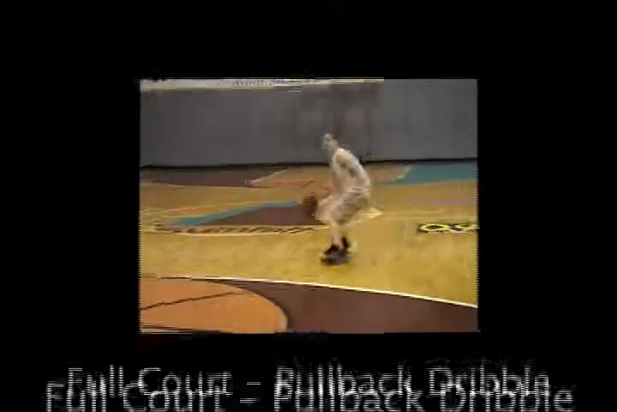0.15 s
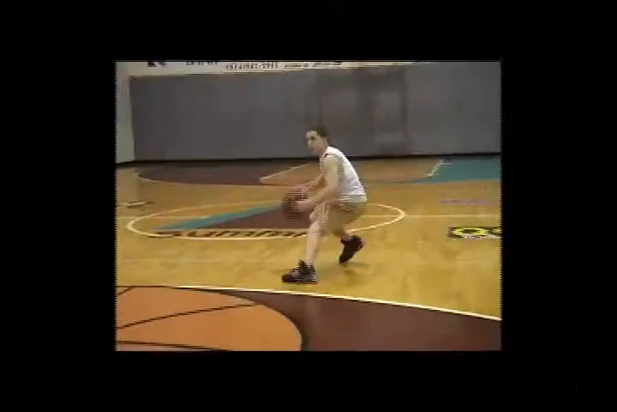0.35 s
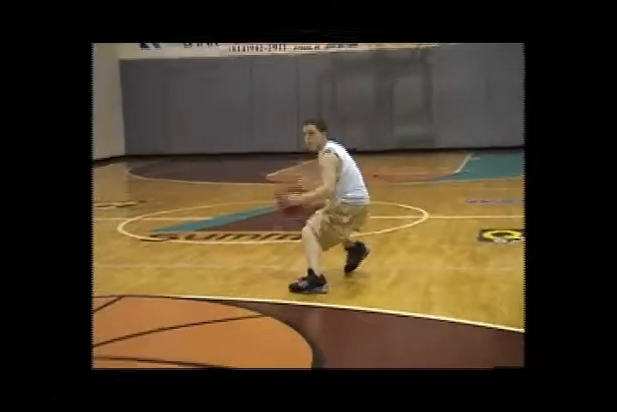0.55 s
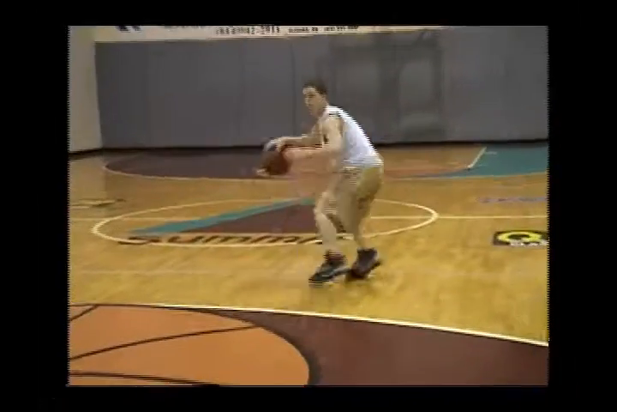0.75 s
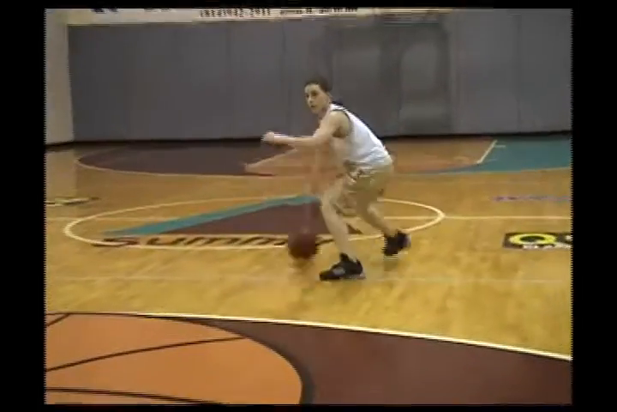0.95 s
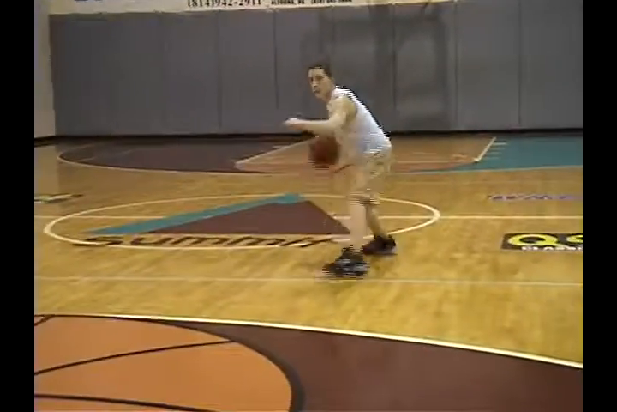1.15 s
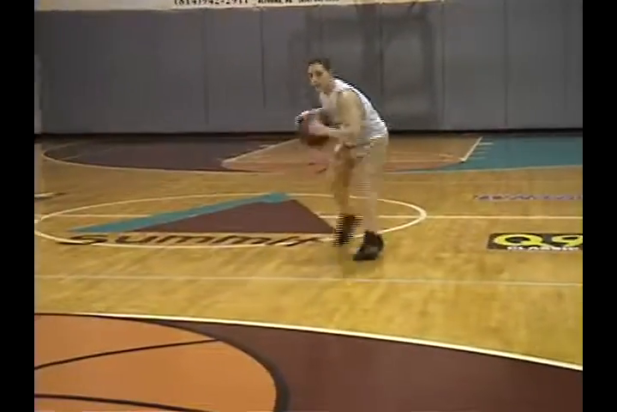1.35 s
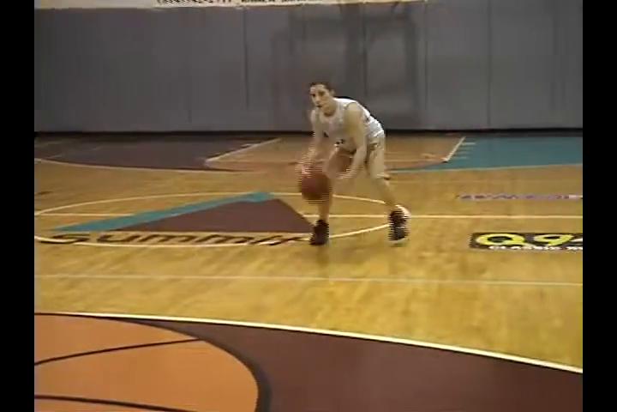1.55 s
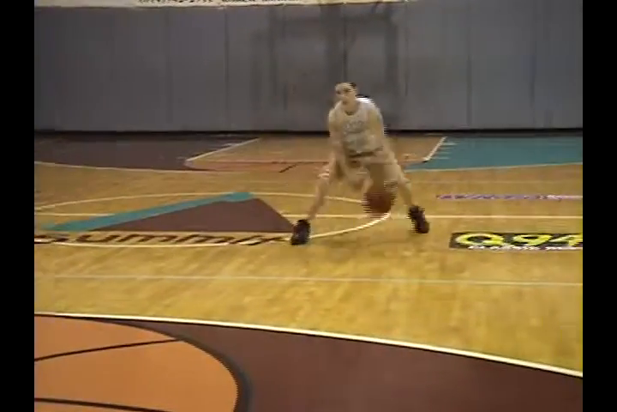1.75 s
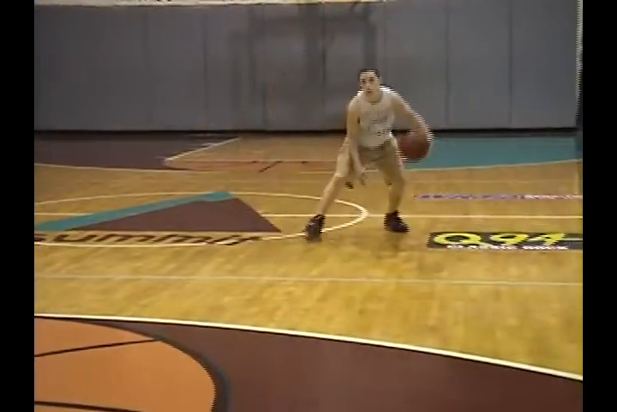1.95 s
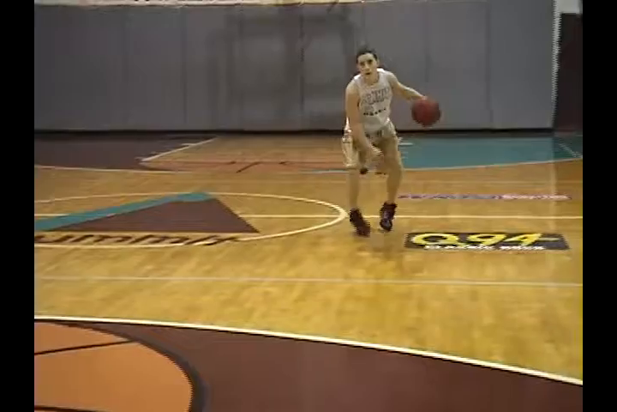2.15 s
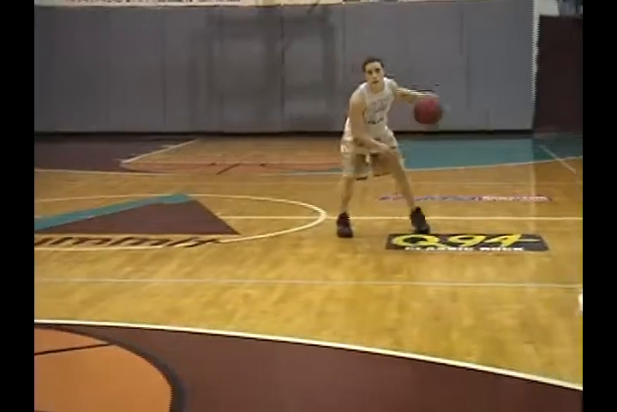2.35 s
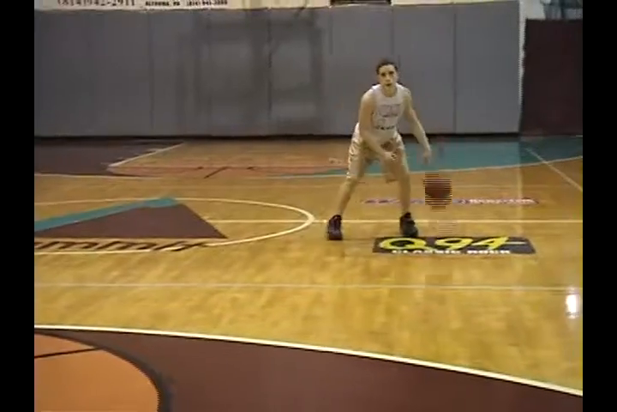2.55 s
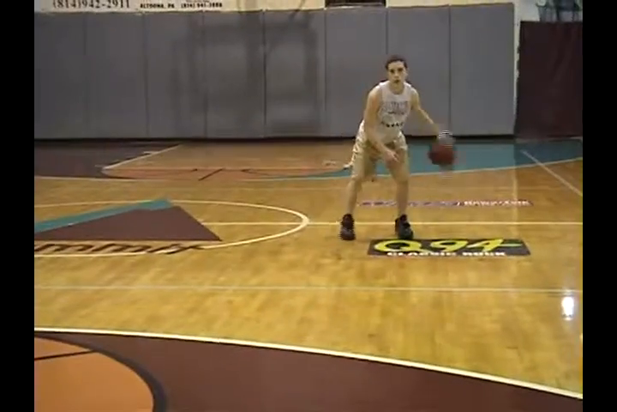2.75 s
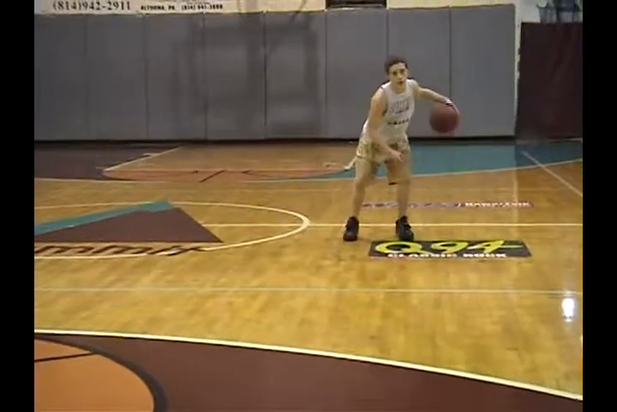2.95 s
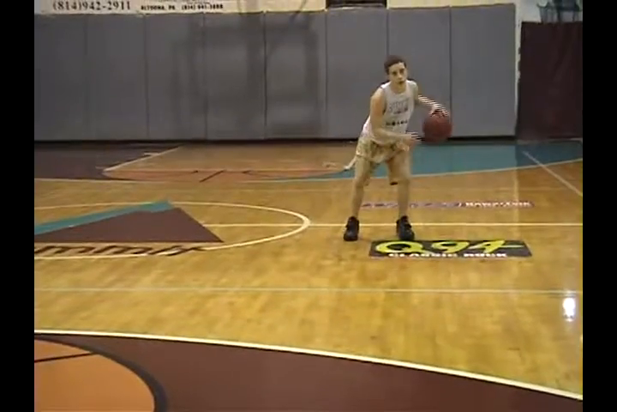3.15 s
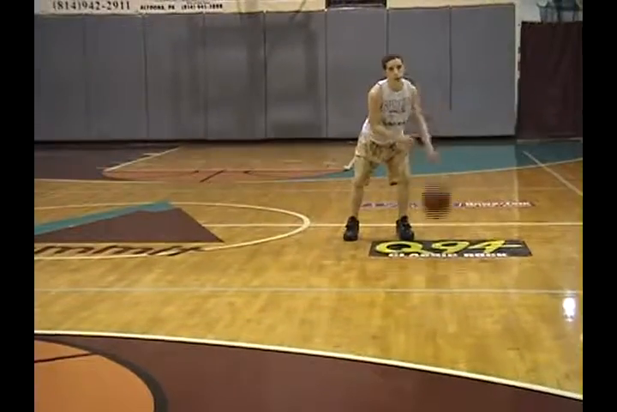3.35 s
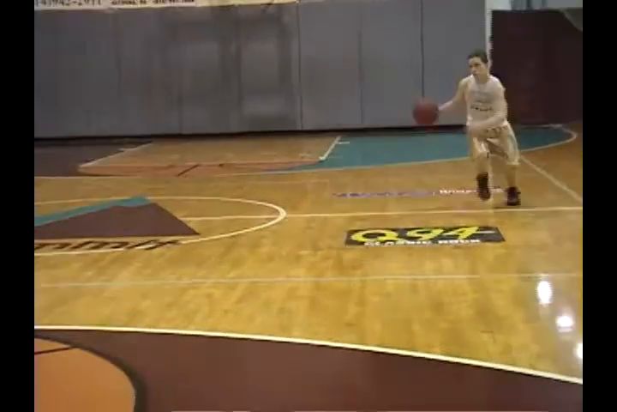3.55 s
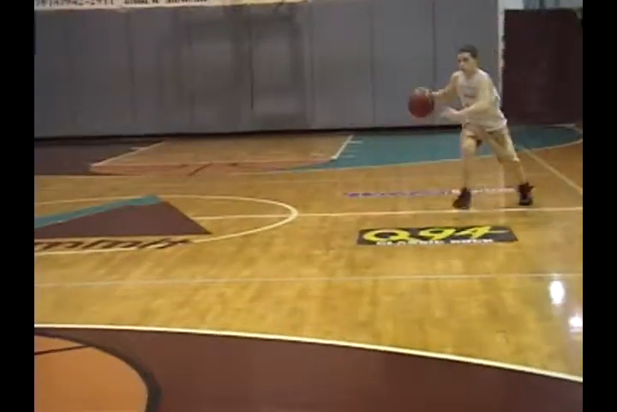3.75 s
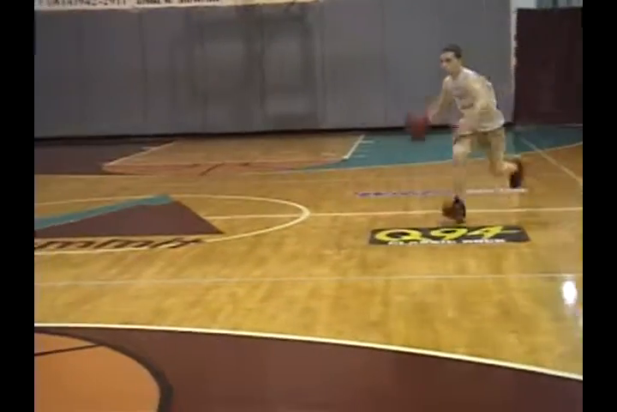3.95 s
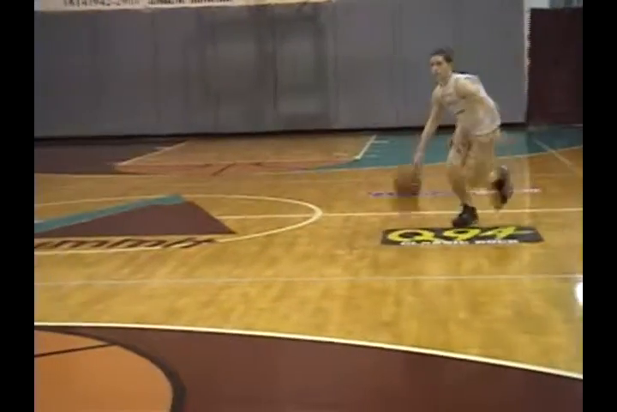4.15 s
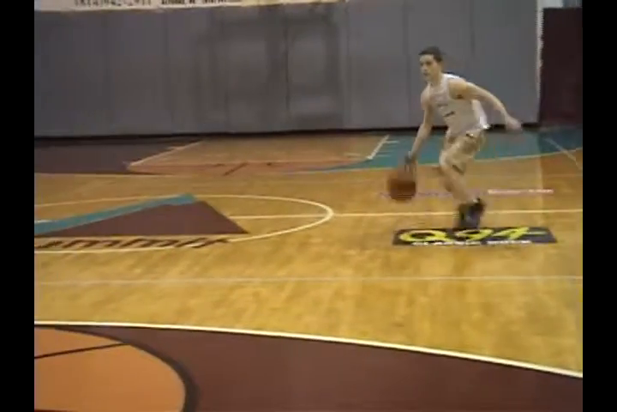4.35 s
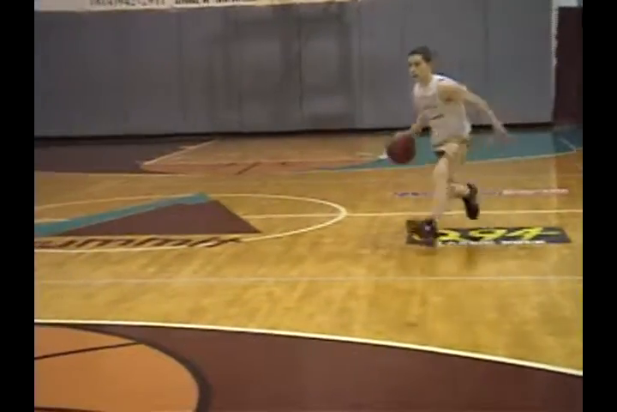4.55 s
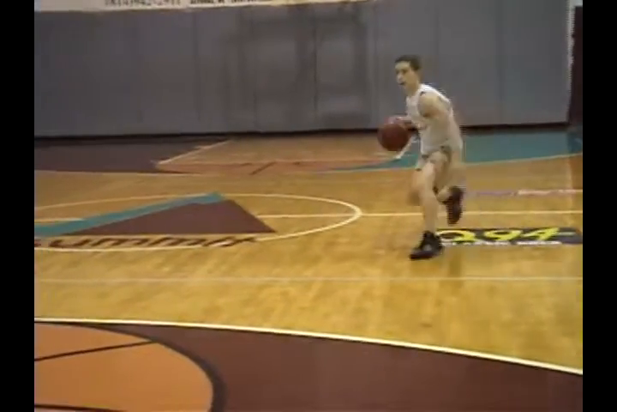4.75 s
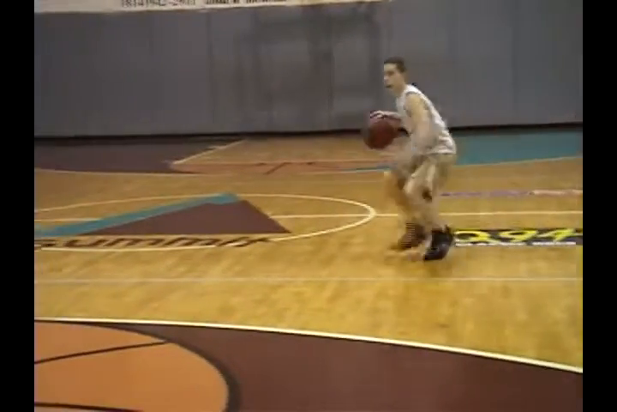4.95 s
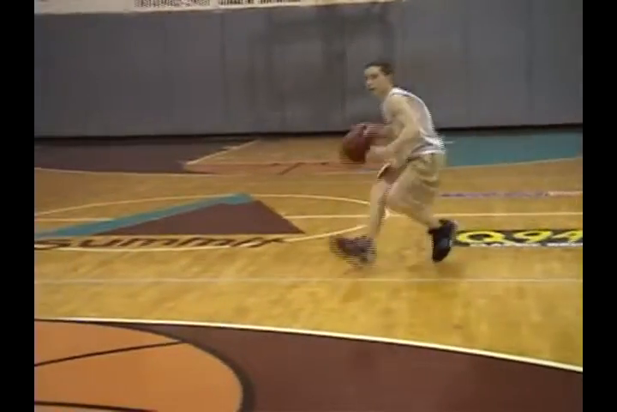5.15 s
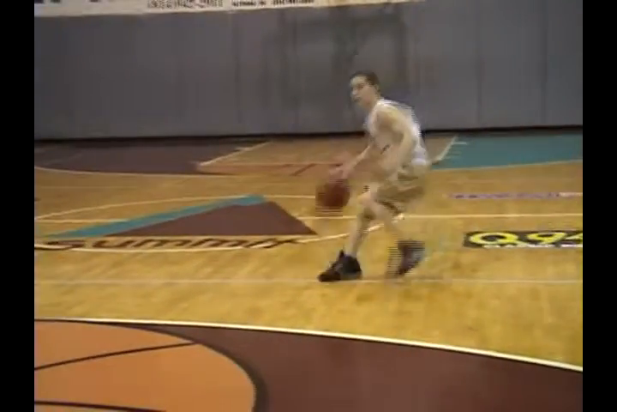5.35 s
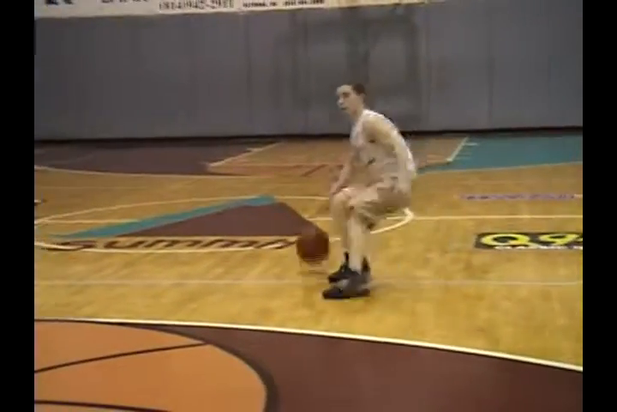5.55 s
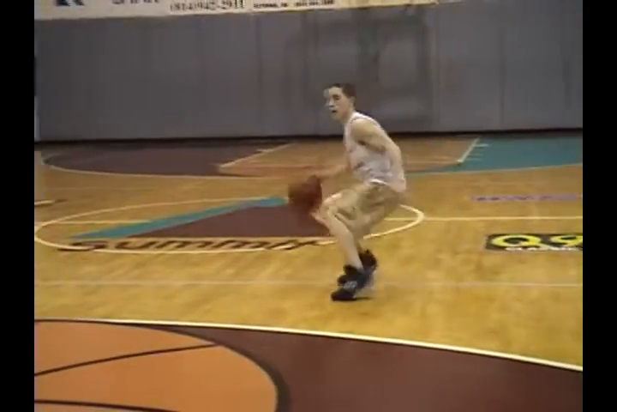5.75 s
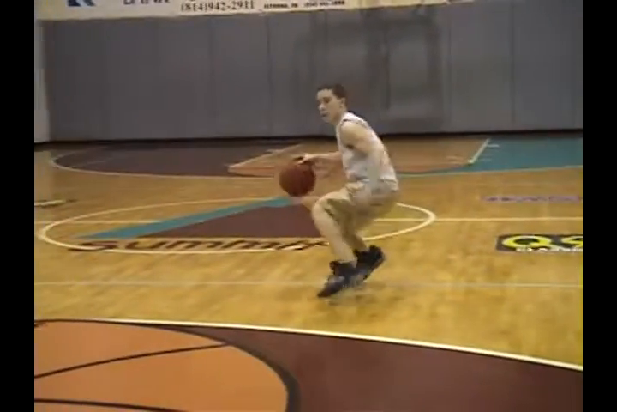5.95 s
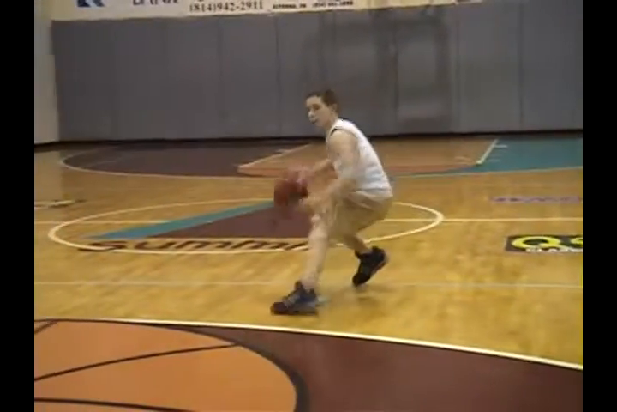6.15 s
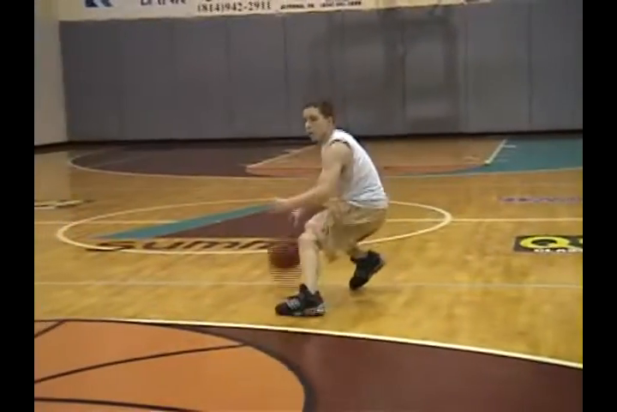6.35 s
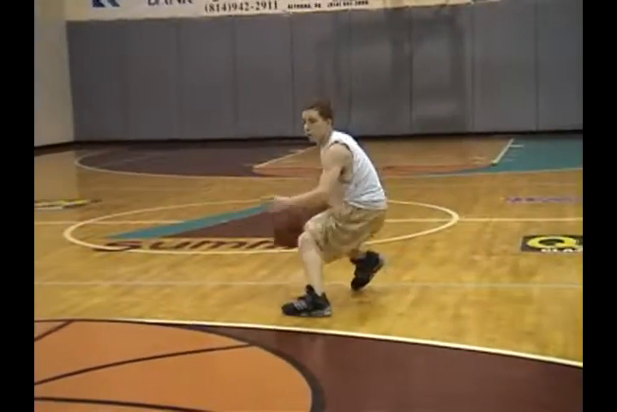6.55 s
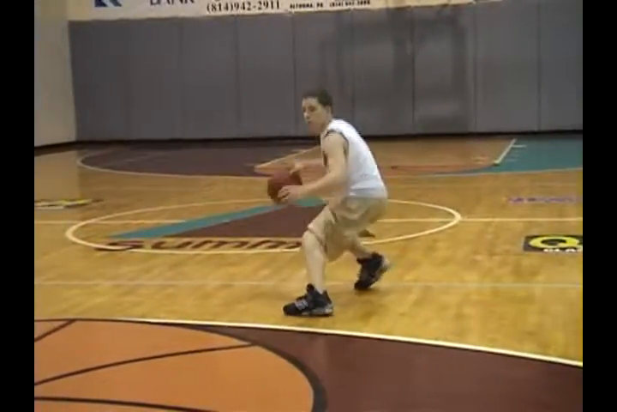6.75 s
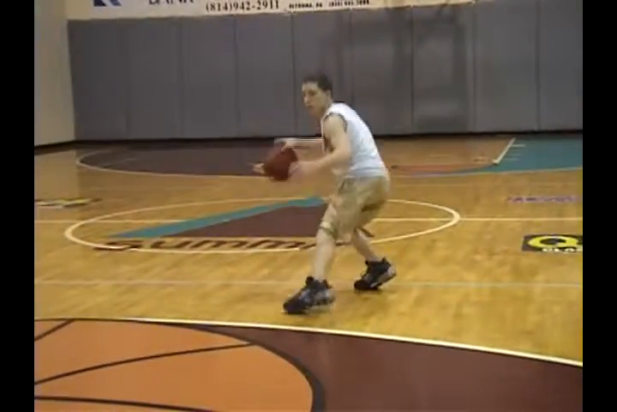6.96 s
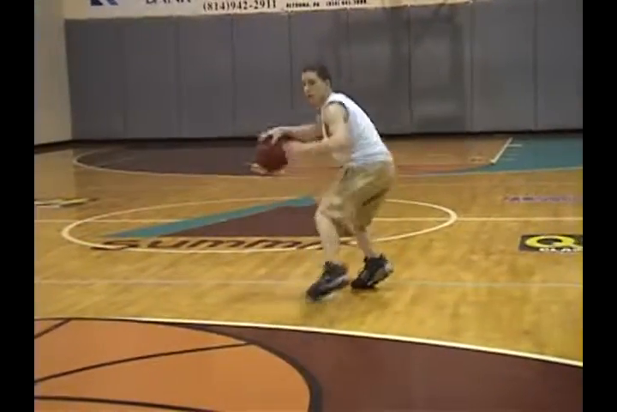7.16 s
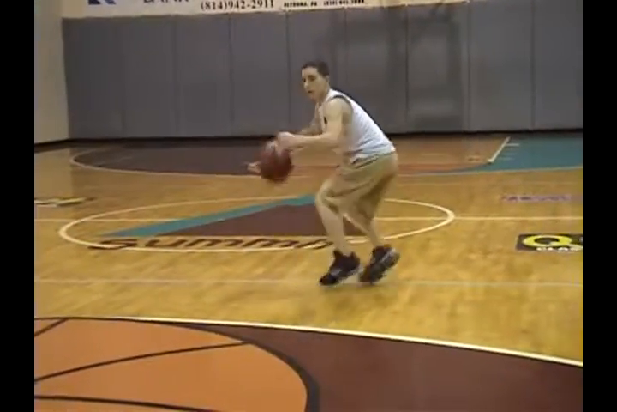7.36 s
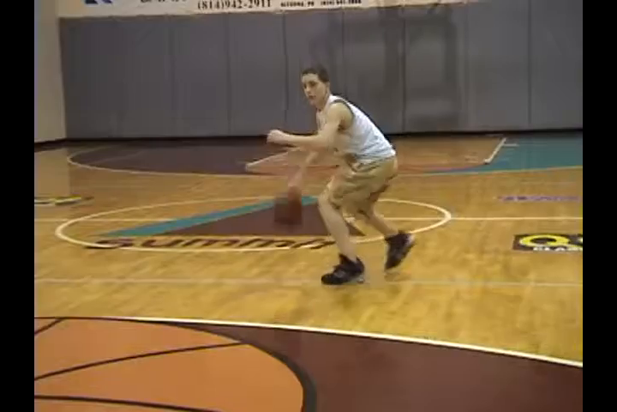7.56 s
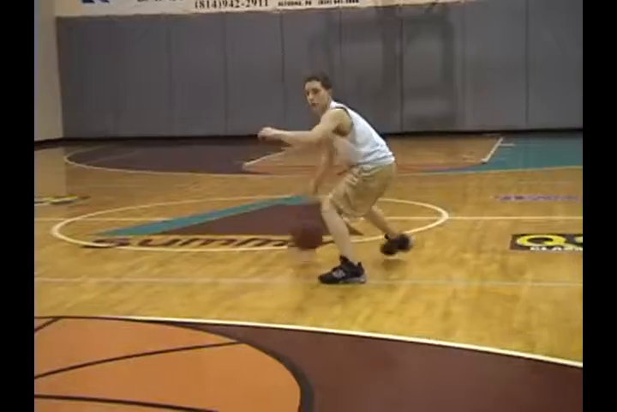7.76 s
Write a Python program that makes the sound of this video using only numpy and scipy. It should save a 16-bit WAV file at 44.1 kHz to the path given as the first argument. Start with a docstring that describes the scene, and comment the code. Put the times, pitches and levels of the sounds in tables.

```python
"""Basketball in a large gym

Close to the microphone a ball cracks on the sprung wooden floor, its skin and air ringing over the
thump of the boards. Shoes stamp and squeak; ventilation hums behind. Each blow returns from a near
surface, the wall and the far end, then rings on in the hall. At 3.6 s the sound jumps back to the
opening moves, now in slow motion: slower, deeper and quieter."""
import sys
import numpy as np
from scipy import signal
from scipy.fft import rfft, irfft, next_fast_len
from scipy.io import wavfile
from scipy.ndimage import uniform_filter1d, map_coordinates

SR = 44100
rng = np.random.default_rng(int(sys.argv[2]) if len(sys.argv) > 2 else 0)


def store_pcm(level_fs):
    """Save levels as 16-bit WAV."""
    pcm = np.round(np.clip(level_fs, -1, 1) * 32767).astype(np.int16)
    wavfile.write(sys.argv[1], SR, np.atleast_2d(pcm).T)


N = 344862

# Times and pitches are at normal speed. Blows before 0 s are struck before the listening starts.
LEAD_S = 1   # the court is already sounding this long before 0 s
COURT, BLOW, TAIL = int(4.7 * SR), int(.3 * SR), int(2.4 * SR)   # lengths in samples
NEAR_ECHO_S, FAR_ECHO_S = .0114, .077
SHOE_DETOUR_M = .55   # a shoe's wall echo travels this much further than the ball's

# Modes of the sprung floor: (multiple of the board pitch, level [dB], t60 [s])
BOARDS = [(.55, -18, 0.42), (.87, -15, 0.11), (1.05, 0.5, 0.045), (1.5, -9.5, 0.07), (1.95, -13.5, 0.046)]


def from_db(db):
    """Decibels to gain."""
    return 10 ** (np.asarray(db) / 20)


def add(track, s, sound):
    """Mix a sound into a track at time s."""
    start = max(round(s * SR), 0)
    part = sound[:len(track) - start]
    track[start:start + len(part)] += part


def low_pass(x, hz, order=2):
    """Causal treble cut."""
    return signal.sosfilt(signal.butter(order, min(hz, .45 * SR), fs=SR, output="sos"), x + 1e-18)


def noise(gain_at, size):
    """Noise of rms 1 whose spectrum follows a function of frequency."""
    hz = np.arange(1, size // 2 + 2) * SR / size
    x = irfft(rfft(rng.standard_normal(size)) * gain_at(hz), size)
    return x / x.std()


def dying(t, t60):
    """Exponential decay, 60 dB down at t60."""
    return np.exp(-np.log(1000) * t / t60)


def smoothed_spectrum(sound, size):
    """Magnitude spectrum averaged over about half an octave."""
    power = abs(rfft(sound, size)) ** 2
    bins = np.arange(len(power)) + 1
    log_grid = np.geomspace(1, len(power), 4000)
    averaged = uniform_filter1d(np.interp(log_grid, bins, power), size=125)
    return np.sqrt(np.interp(bins, log_grid, abs(averaged)))


def steady_background():
    """Steady background: a rush of air and a wavering motor hum, with a few thin, steady high tones above them."""
    # Spectrum of the moving air: (frequency [Hz], relative density [dB])
    air = [(15, -48.5), (25, -14.5), (48, 0), (81, -0.5), (109, -5), (186, 1.5), (309, -4.5), (354, -4),
           (415, -6), (501, -4), (833, -12.5), (4150, -31.5), (10000, -43.5), (15000, -52)]
    # Narrow noise bands of the motor hum: (centre [Hz], level [dB], width [Hz])
    hum_bands = [(55.5, -55.5, 8), (121.1, -44, 2.023), (328.5, -50.5, 15), (487, -54.5, 8)]
    # Thin tones of a small motor: (frequency [Hz], level [dB])
    whine_tones = [(4043, -62), (5760, -74), (6239, -67), (6481, -69), (6600, -68.5), (6780, -68.5)]
    t = np.arange(COURT) / SR
    hum = sum(from_db(db) * noise(lambda f: 1 / (1 + (2 * (f - hz) / width) ** 2), COURT)
              for hz, db, width in hum_bands)
    whine = sum(from_db(db) * np.sqrt(2) * np.sin(2 * np.pi * (hz * t + rng.random()))
                for hz, db in whine_tones)
    air_hz, air_db = np.transpose(air)
    rush = noise(lambda f: from_db(np.interp(np.log(f), np.log(air_hz), air_db)), COURT)
    return from_db(-34) * rush + hum + whine


def ring(modes, scale, spread_db, detune):
    """Struck modes, their pitches times scale; strength and pitch vary with the spot that is hit."""
    t = np.arange(BLOW) / SR
    out = np.zeros(BLOW)
    for pitch, db, t60 in modes:
        louder, sharper = rng.standard_normal(2)
        hz = pitch * scale * (1 + detune * sharper)
        out += from_db(db + spread_db * louder) * np.sin(2 * np.pi * hz * t) * dying(t, t60)
    return out


def grit(t60):
    """Rubber meets varnish in a quickly dying burst of noise."""
    # Spectrum of the gritty contact: (frequency [Hz], relative density [dB])
    spectrum = [(200, -24.5), (700, 6), (1600, 2), (3000, -8.5), (4300, -9), (5600, -23), (8000, -12.5),
                (11000, -24), (15000, -37)]
    hz, db = np.transpose(spectrum)
    bin_hz = np.arange(1, BLOW + 2) * SR / (2 * BLOW)
    colour = from_db(np.interp(np.log(bin_hz), np.log(hz), db))
    white = rng.standard_normal(BLOW) * dying(np.arange(BLOW) / SR, t60)
    flattened = rfft(white, 2 * BLOW) / smoothed_spectrum(white, 2 * BLOW)
    burst = irfft(flattened * colour)[:BLOW]
    return burst * white.std() / burst.std()


def contact(body, scale, ring_db, crack_db, edge_db, snap_db, snap_s, grit_db, grit_t60):
    """A sharp pressure spike, a gritty burst just after it and the ring of the striking body."""
    t = np.arange(BLOW) / SR
    crack = from_db(snap_db) * t / snap_s * np.exp(1 - t / snap_s)
    add(crack, .0003, from_db(grit_db) * grit(grit_t60))
    soft = low_pass(crack, hz=13000, order=1)
    crack = soft + from_db(edge_db) * (crack - soft)   # a flatter hit has a harder edge
    ringing = ring(body, scale, spread_db=4.5, detune=.024) * (1 - np.exp(-t / .00021))
    return from_db(crack_db) * crack - from_db(ring_db) * ringing


def shoe_blow(thud_db, ring_db, slap_db):
    """Part of a shoe slaps the floor, and the boards thud under it."""
    # The sole and the air squeezed from under it: (frequency before scaling [Hz], level [dB], t60 [s])
    sole_modes = [(464, -19.5, 0.067), (593, -18, 0.07), (931, -13.5, 0.027), (1685, -17.5, 0.022),
                  (2900, -18, 0.0095)]
    board_hz = 238.6
    thud = -from_db(thud_db) * ring(BOARDS, board_hz, spread_db=5, detune=.023)
    slap = contact(sole_modes, scale=.918, ring_db=ring_db, crack_db=slap_db, edge_db=-6,
                   snap_db=3, snap_s=.00008, grit_db=-4.5, grit_t60=.0035)
    return thud + slap


def footwork(bands):
    """The heel clicks down, then the sole lands with the player's weight."""
    # Footfalls: (time [s], heel-to-sole delay [s], heel level [dB], sole level [dB], room level [dB])
    steps = [(-.1496, .0036, -2, -4.5, 2.5), (.1053, .0052, -7, -4.5, -5.5), (.4250, .003, -21, -25, -3),
             (1.0248, .0022, -12, -13.5, -9)]
    out = np.zeros(COURT)
    for s, roll_s, heel_db, sole_db, room_db in steps:
        step = from_db(heel_db) * shoe_blow(thud_db=-15, ring_db=-3, slap_db=0)
        add(step, roll_s, from_db(sole_db) * shoe_blow(thud_db=-4.5, ring_db=10, slap_db=-.5))
        add(out, LEAD_S + s, in_gym(step, bands, wall_delay(s, SHOE_DETOUR_M), room_db, echoes_db=-1))
    return out


def dribble(bands):
    """The ball cracks on the varnish and pushes the boards down; they swing back and throw it off."""
    # Bounces: (time [s], strength [dB], smack [dB], board pitch [Hz], contact time [s], room level [dB])
    bounces = [(-.95, 1.5, -4, 145, .005, 6.7), (-.3233, 0, 2.5, 150, .0042, 4.5),
               (.1871, 2.5, -5, 165, .0037, .3), (.5414, 0, -4, 140, .0042, 0),
               (1.0623, 0, -1.2, 162, .005, 0), (1.7809, -3, -2.5, 160, .0055, -1),
               (2.7187, .7, -5, 135, .005, 0), (3.5118, -1.7, -.5, 140, .003, 0)]
    # The ball's skin and the air inside: (frequency [Hz], level [dB], t60 [s])
    ball_modes = [(510, -18, 0.04), (781, -21, .035), (1020, -18, 0.019), (1126, -32.5, .22),
                  (1220, -22.5, 0.031), (1637, -19.5, 0.033), (2017, -29.5, 0.017), (2656, -27, 0.016),
                  (4000, -31.5, .006)]
    push_s, lift_s = .0021, .0027   # hardest push ahead of lift-off; length of the lift-off pulse
    out, t = np.zeros(COURT), np.arange(BLOW) / SR
    lift = from_db(-13) * np.sin(np.pi * np.minimum(t / lift_s, 1)) ** 2
    give = 1 - np.exp(-t / .0013)   # the boards take a moment to give way
    for s, db, smack_db, board_hz, contact_s, room_db in bounces:
        thump = np.zeros(BLOW)
        add(thump, contact_s - push_s, -ring(BOARDS, board_hz, spread_db=-.1, detune=.015) * give)
        add(thump, contact_s, lift)
        skin_db = 1.9 + .12 * db   # the skin rings more on a hard bounce
        edge_db = .1 - 1.7 * smack_db   # a full smack has a rounder edge
        crack = contact(ball_modes, scale=1, ring_db=skin_db, crack_db=smack_db, edge_db=edge_db,
                        snap_db=2, snap_s=.00005, grit_db=-9.5, grit_t60=.022)
        bounce = from_db(db) * (from_db(-2) * thump + crack)
        add(out, LEAD_S + s, in_gym(bounce, bands, wall_delay(s), room_db))
    return out


def squeak(bands):
    """A rubber sole skids with a swelling hiss, then sticks and slips in a short, rough, falling chirp."""
    grip_s, skid_s, chirp_s = .4508, .035, .007
    from_hz, to_hz = 2950, 1950
    out, t = np.zeros(COURT), np.arange(BLOW) / SR
    progress = np.minimum(t / chirp_s, 1)
    uneven = 1 + .08 * noise(lambda f: 1 / (1 + (f / 1500) ** 2), BLOW)
    slip_hz = (from_hz + (to_hz - from_hz) * progress) * uneven
    phase = 2 * np.pi * np.cumsum(slip_hz) / SR
    slips = sum(np.sin(k * phase) / k for k in range(1, 5))
    scuff = from_db(-6) * noise(lambda f: 1 / (1 + (2200 / f) ** 4) / (1 + (f / 8500) ** 8), BLOW)
    hiss = noise(lambda f: 1 / (1 + (f / 6500) ** 4), BLOW)
    rub = from_db(-31.5) * hiss * t / skid_s * (t < skid_s)
    add(rub, skid_s, from_db(-15.5) * (slips + scuff) * np.sin(np.pi * progress) ** 2)
    wall_s = wall_delay(grip_s, SHOE_DETOUR_M)
    add(out, LEAD_S + grip_s - skid_s, in_gym(rub, bands, wall_s, room_db=-7.5, echoes_db=-13))
    return out


def wall_delay(s, further_m=0):
    """Seconds by which the wall echo trails the direct sound, from where the player is at time s."""
    # Extra distance to the microphone by way of the wall: (time [s], detour [m])
    detours = [(-.32, 13.38), (.54, 13.07), (1.06, 12.69), (1.78, 12.9), (2.72, 13.77)]
    sound_m_per_s = 343
    return (np.interp(s, *np.transpose(detours)) + further_m) / sound_m_per_s


def build_up(t):
    """The hall fills gradually, with a wave of scattered sound around each of the three echoes."""
    fill_s, wave_share = .052, .42   # a wave's decay time is this share of its echo's delay
    echoes = [(NEAR_ECHO_S, -4), (wall_delay(0), -3), (FAR_ECHO_S, 0)]   # (delay [s], scatter [dB])
    waves = sum(from_db(db) ** 2 * (t > s) * np.exp(-abs(t - s) / (wave_share * s)) for s, db in echoes)
    return np.sqrt(1 - np.exp(-t / fill_s) + waves)


def bunching():
    """Early reflections arrive in clumps; later ones merge into a smooth wash."""
    depth_db = 6 * dying(np.arange(TAIL) / SR, t60=.92)
    clumps = np.clip(noise(lambda f: 1 / (1 + (f / 168.9) ** 2), TAIL), -2, 2)
    power_trim = np.exp((depth_db * np.log(10) / 20) ** 2)   # keeps the mean power about level
    return from_db(depth_db * clumps) / power_trim


def hall_bands():
    """The diffuse field of the hall: a noise and a decay envelope for each band."""
    # Reverberation of the gym: (band centre [Hz], level [dB], t60 [s])
    hall = [(40, -9, 1.6), (80, -0.5, 3.8), (160, 1, 1.4), (318, 2, 0.77), (610, 1.5, 1.7),
            (1180, 0.5, 2.2), (2457, 2.43, 2.22), (3900, 3, 1.83), (5500, -0.5, 1.8), (9600, -5.5, 1.1),
            (14440, -18, 0.55)]
    t = np.arange(TAIL) / SR
    log_centres = np.log([row[0] for row in hall])
    log_hz = np.log(np.arange(1, TAIL + 2) * SR / (2 * TAIL))
    white = rfft(rng.standard_normal(2 * TAIL))
    filling = build_up(t)
    bands = []
    for (_, db, t60), share in zip(hall, np.eye(len(hall))):
        field = irfft(white * np.interp(log_hz, log_centres, share))
        decay = dying(t, t60) * np.sqrt(2 * np.log(1000) / (t60 * SR))   # unit energy
        bands.append((field, from_db(db) * filling * decay))
    return bands


def in_gym(sound, bands, wall_s, room_db, echoes_db=0):
    """At the microphone: direct sound, three distinct echoes and a tail that differs for each blow."""
    bass_cut = signal.butter(2, 95, "high", fs=SR, output="sos")   # small sources radiate little bass
    sound = signal.sosfilt(bass_cut, sound + 1e-18)
    place = int(rng.random() * TAIL)
    response = bunching() * sum(field[place:place + TAIL] * envelope for field, envelope in bands)
    size = next_fast_len(TAIL + BLOW)
    radiated = smoothed_spectrum(sound, size)   # what the source sends out in all directions together
    out = from_db(room_db) * irfft(rfft(response, size) * radiated, size)[:TAIL]
    dull = from_db(echoes_db) * low_pass(sound, hz=8200)
    bass = low_pass(dull, hz=750, order=1)
    off_wall = bass + from_db(4) * (dull - bass)   # panels give way to the bass and throw back the smack
    add(out, 0, sound)
    add(out, NEAR_ECHO_S, -from_db(-12.5) * dull)
    add(out, wall_s, from_db(-9 + .93 * room_db) * off_wall)
    add(out, FAR_ECHO_S, from_db(-21) * dull)
    return out


def slow_replay(court):
    """The court plays at normal speed, then its opening returns, quieter and slowed like a tape."""
    jump_s, replay_zero_s = 3.612, 5.20937   # the replay starts; it passes the court's 0 s
    slowdown, replay_db = 2.496, -15
    t = np.arange(N) / SR
    replay = t >= jump_s
    court_s = np.where(replay, (t - replay_zero_s) / slowdown, t)
    played = map_coordinates(court, [(court_s + LEAD_S) * SR], order=3)
    return played * from_db(replay_db * replay)


def scene():
    """Ball, shoes and room tone at one courtside microphone, then the slow replay."""
    bands = hall_bands()
    court = dribble(bands) + footwork(bands) + squeak(bands) + steady_background()
    ceiling = 1.43   # the microphone rounds the loudest peaks
    court = ceiling * np.tanh(court / ceiling)
    return slow_replay(record(court))[None]   # the treble limit drops with the replay's pitch


def record(dry):
    """The top of the treble is cut steeply."""
    cutoff_hz = 15100
    return signal.sosfilt(signal.ellip(10, .1, 80, cutoff_hz, fs=SR, output="sos"), dry)


dry = scene()
out = record(dry)
store_pcm(out)
```